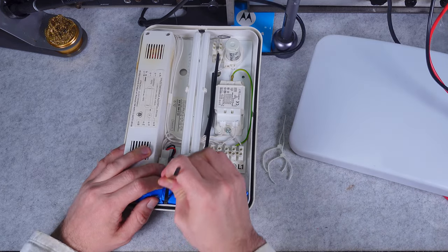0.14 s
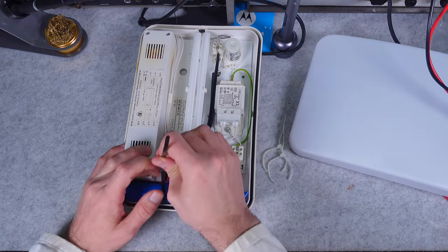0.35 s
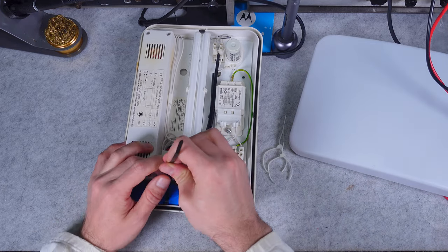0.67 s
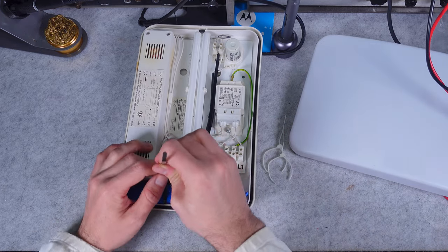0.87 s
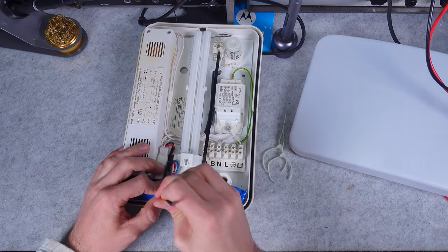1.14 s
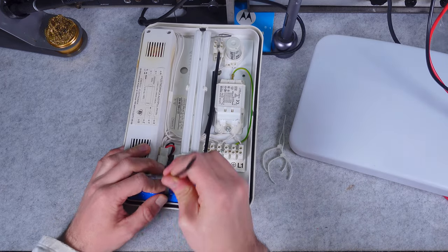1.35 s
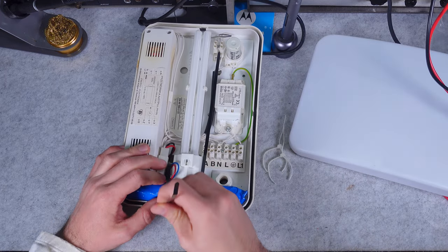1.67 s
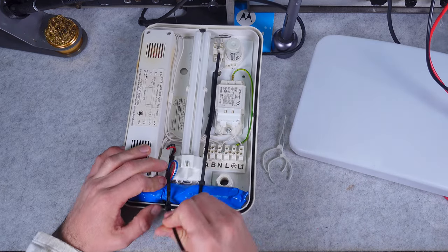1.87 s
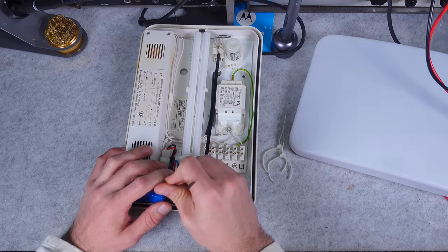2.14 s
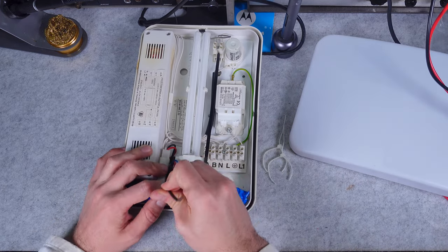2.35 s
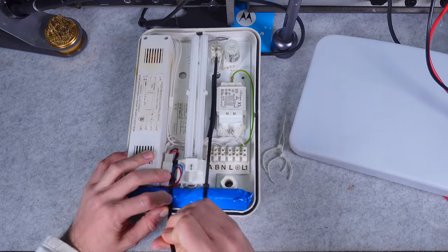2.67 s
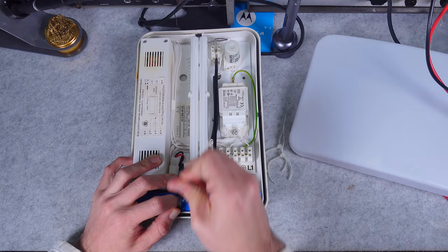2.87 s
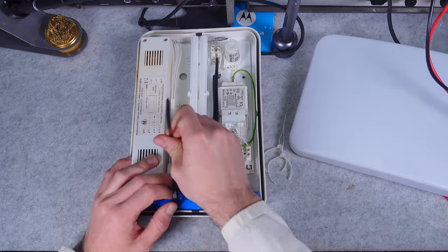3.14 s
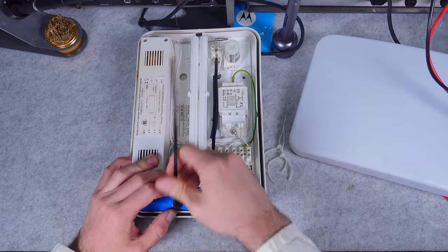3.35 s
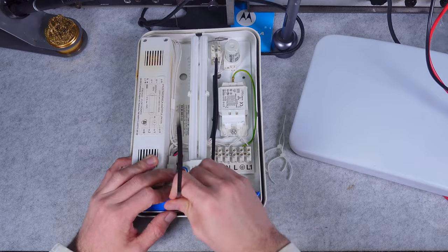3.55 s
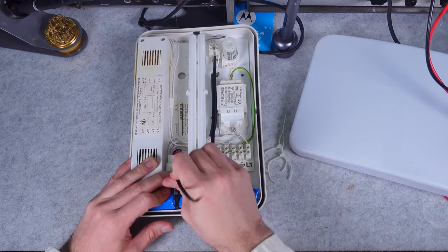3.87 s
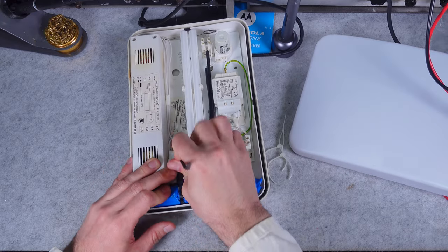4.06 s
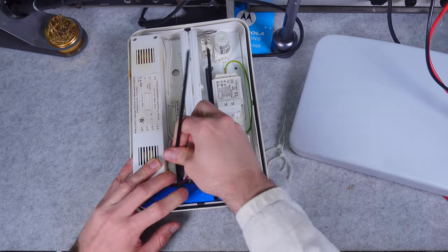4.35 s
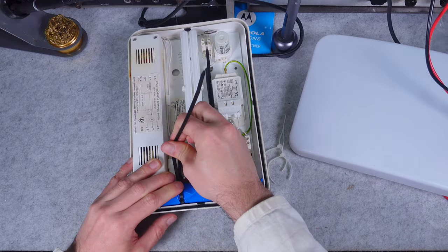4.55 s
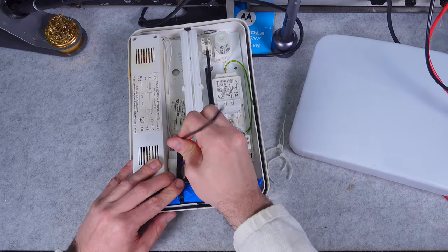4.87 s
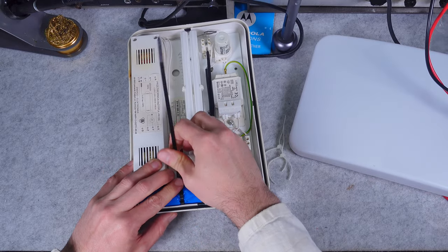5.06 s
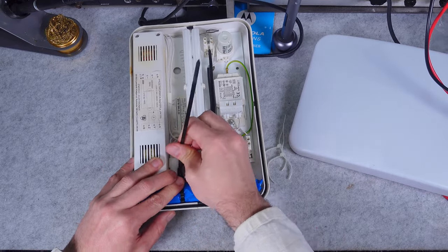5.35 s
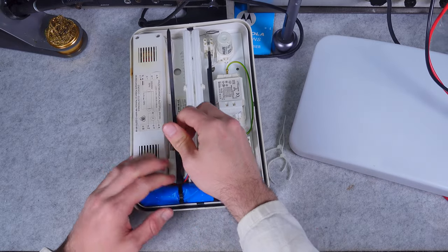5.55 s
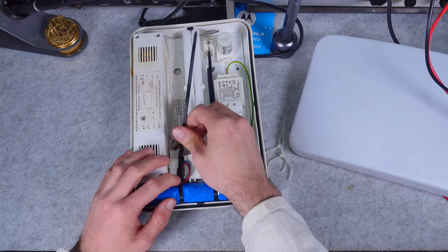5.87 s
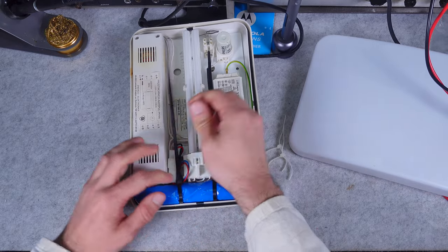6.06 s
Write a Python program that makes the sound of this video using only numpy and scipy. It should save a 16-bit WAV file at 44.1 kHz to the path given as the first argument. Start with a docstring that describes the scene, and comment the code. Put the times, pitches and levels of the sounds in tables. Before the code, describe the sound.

Nylon cable tie pulled tight in two quick ratcheting zips, amid close plastic rustling, finger rubs, ticks and knocks on a hollow housing.

```python
"""Two hands tighten a nylon cable tie around a battery pack inside a plastic lamp housing on a padded workbench.
Fingers slide and snag, a forearm brushes the mat, the loose tail ticks, the pack knocks and the strap creaks.
Near 0.9 s and again near 2.4 s the strap is pulled: clicks, one per tooth, run together into a zip.
Handling goes on to the end, with the hardest knocks after 4 s. Sliding is stick-slip noise; each blow is
a coloured noise burst. All is heard close, through the housing, in a small workshop with faint air."""
import sys
import numpy as np
from scipy import signal
from scipy.fft import rfft, irfft
from scipy.io import wavfile
from scipy.ndimage import uniform_filter1d

SR = 44100
rng = np.random.default_rng(int(sys.argv[2]) if len(sys.argv) > 2 else 0)


def transcribe(signal):
    """Save signal, clipped to [-1, 1], as a 16-bit WAV file at the path in sys.argv[1]."""
    frames = np.atleast_2d(signal).T
    limited = np.clip(frames, -1, 1)
    pcm = np.round(limited * 32767).astype(np.int16)
    wavfile.write(sys.argv[1], SR, pcm)


N = 273280

BLOW_SIZE = 4096   # samples in one blow
BLOW_T = np.arange(BLOW_SIZE) / SR
BLOW_HZ = np.fft.rfftfreq(BLOW_SIZE, 1 / SR)
TICK_THUD_DB = -15.5   # how much a light tick shakes the housing

# Edges of the thud, knock, click and snap bands of a blow. Two entries per band: lower and upper edge [Hz].
STRENGTH_HZ = [100, 300, 700, 1900, 3000, 6000, 10000, 16000]
# The heavy battery pack shifts and thumps the housing.
# Each row: start in seconds, ring in Hz, relative level in dB, contact in ms.
KNOCKS = [(0.0457, 1180, -2.5, 0.37), (3.9737, 3670, -10, 0.18), (4.1277, 2090, 3, 0.095),
          (4.136, 3370, 1, 0.21), (4.145, 2540, 10, 0.35), (4.1666, 3560, 0, 0.13), (4.237, 3800, -7, 0.15),
          (4.335, 4820, -16, .09), (4.4295, 1740, -7.5, 0.12), (4.7636, 1020, -7, 0.37),
          (5.5182, 5030, -9, 0.12), (5.5341, 5000, 0.5, 0.024), (6.171, 714, -8, 0.59)]
# Fingers slide on the plastic.
# Each row: start in seconds, length in seconds, relative level in dB, pressure relative to the rub in dB.
STROKES = [(0, 0.048, 14, -5), (0.069, .18, 8, -1), (0.37, 0.072, 1.5, 1), (0.493, 0.25, -11.5, 6),
           (0.881, .18, -1.5, 7.5), (1.093, 0.14, 5.5, -4.5), (1.427, 0.066, -8, -3),
           (1.665, 0.18, -10, 4.5), (1.806, 0.069, 3.5, 2), (2.013, .11, -11.5, 5.5), (2.252, 0.08, -9, 2),
           (2.61, 0.12, 8, 2), (2.757, 0.1, -0.5, -2), (2.967, 0.12, -3, -0.5), (3.197, 0.1, -7.5, -1),
           (3.455, 0.035, -1.5, -9), (3.61, 0.072, 2.5, -2.5), (3.729, 0.23, -4, -4), (3.959, .12, -2, 7),
           (4.088, 0.1, 5.5, 8), (4.259, 0.25, -1, 4), (4.525, 0.063, -1, 3), (4.745, .12, -3.5, 0.5),
           (4.961, 0.054, 5.5, -10), (5.28, 0.14, -0.5, 10), (5.362, 0.052, 4, 7), (5.52, .09, 2, 2.5),
           (5.945, .08, -1, 3), (6.128, 0.065, -8.5, 14)]


def from_db(db):
    """Decibels to gain."""
    return 10 ** (np.asarray(db) / 20)


def rms_one(x):
    """Scale to unit rms."""
    return x / np.sqrt(np.mean(x ** 2) + 1e-20)


def at_hz(points, hz):
    """Read a spectrum in dB on a log-frequency axis."""
    knots, values = np.transpose(points)
    return np.interp(np.log(np.maximum(hz, 1)), np.log(knots), values)


def tint(x, spectrum):
    """Give a steady sound a spectrum; rms 1."""
    gain = from_db(at_hz(spectrum, np.fft.rfftfreq(N, 1 / SR)))
    return rms_one(irfft(rfft(x) * gain, N))


def add(out, s, sound):
    """Mix a short sound in at time s."""
    start = int(np.clip(s * SR, 0, N - 1))
    out[start:start + len(sound)] += sound[:N - start]


def friction(slips_per_s, spread_db, slip_s, smooth):
    """Stick and slip: tiny dying bursts of uneven size over a smooth slide."""
    slips = rng.random(N) < slips_per_s / SR
    sizes = slips * from_db(spread_db * np.minimum(rng.exponential(1, N), 3))
    decay = np.exp(-2 / (slip_s * SR))
    energy = signal.lfilter([1], [1, -decay], sizes ** 2 + 1e-18)
    return rng.standard_normal(N) * np.sqrt(smooth + energy / energy.mean())


def blow(burst, strengths, colour_db):
    """Even out a burst's spectrum, then colour it with a causal (minimum-phase) filter."""
    power = uniform_filter1d(np.abs(rfft(burst)) ** 2, size=61) + 1e-12
    bands = list(zip(STRENGTH_HZ, np.repeat(strengths, 2)))
    gain = from_db(at_hz(bands, BLOW_HZ) + colour_db) / np.sqrt(power)
    # folding the cepstrum onto positive time turns the gain into a minimum-phase filter
    cepstrum = irfft(np.log(gain))
    cepstrum[1:BLOW_SIZE // 2] *= 2
    cepstrum[BLOW_SIZE // 2 + 1:] = 0
    return irfft(rfft(burst) * np.exp(rfft(cepstrum)))


def ring_peak(ring_hz, octaves, lift_db):
    """A resonance as a lift in dB over the spectrum of a blow."""
    return lift_db / (1 + (np.log2((BLOW_HZ + 1) / ring_hz) / octaves) ** 2)


def touch(level_db, contact_ms, thud_db):
    """Thud, knock, click and snap of a contact in dB; the longer it lasts, the less treble it has."""
    click_db, rolloff_slope = -0.5, 3.9
    centres_hz = np.sqrt(np.prod(np.reshape(STRENGTH_HZ, (-1, 2)), axis=1))
    cycles = centres_hz * contact_ms / 1000
    return level_db + np.array([thud_db, 0, click_db, 0]) - 10 * np.log10(1 + cycles ** rolloff_slope)


def contact(drag_s, fade_s, grain_db, ring_hz, ring_db, strengths):
    """Plastic drags, lets go and rings at one pitch."""
    # Colour of a contact on top of its four strengths. Each row: frequency in Hz, lift in dB.
    touch_colour = [(30, -22), (80, -12.5), (200, -7.5), (430, -3.5), (750, -1), (1400, -2.5), (3300, 1.5),
                    (7500, -3.5), (16000, -6)]
    swell = np.minimum(BLOW_T / drag_s, 1)
    fade = np.exp(-np.maximum(BLOW_T - drag_s, 0) / fade_s)
    roughness = rms_one(uniform_filter1d(rng.standard_normal(BLOW_SIZE), size=24))
    slips = from_db(grain_db * roughness)
    colour_db = at_hz(touch_colour, BLOW_HZ) + ring_peak(ring_hz, octaves=0.15, lift_db=ring_db)
    return blow(rng.standard_normal(BLOW_SIZE) * swell * fade * slips, strengths, colour_db)


def room_air():
    """The quiet room is a steady, faint noise, alike in both channels."""
    # Spectrum of the quiet room. Each row: frequency in Hz, relative dB per Hz.
    air_spectrum = [(30, -3), (70, 14), (350, -5), (700, 17.5), (2000, -6.5), (5000, -2), (16000, -16)]
    return from_db(-64.5) * tint(rng.standard_normal(N), air_spectrum)


def side_air():
    """Faint noise of opposite sign in the two channels widens the quiet."""
    # Spectrum of the opposed noise. Each row: frequency in Hz, relative dB per Hz.
    side_spectrum = [(30, 0), (80, 2), (300, 5), (1000, -7), (5000, -13), (15000, 1.5)]
    return from_db(-68.5) * tint(rng.standard_normal(N), side_spectrum)


def sleeve():
    """The forearm slides on the mat: cloth and skin brush it with a fine, high hiss."""
    # The slide is strongest as the hand takes its first grip. Each row: time in seconds, level in dB.
    brushing = [(0, -66), (.25, -61), (.36, -59), (.6, -60.5), (.85, -65.5), (1.5, -68.5), (5.8, -75)]
    # Spectrum of the brushing. Each row: frequency in Hz, relative dB per Hz.
    brush = [(1500, -14), (5000, 2), (8000, -2.5), (11000, 3), (16000, -9)]
    s, level_db = np.transpose(brushing)
    fibres = friction(slips_per_s=1600, spread_db=4, slip_s=0.00054, smooth=0.97)
    return from_db(np.interp(np.arange(N) / SR, s, level_db)) * tint(fibres, brush)


def stroke(start, length_s):
    """A finger gets moving, slides and comes to rest."""
    attack_s, release_s = 0.011, 0.037
    t = np.arange(N) / SR - start
    return np.clip(t / attack_s, 0, 1) * np.exp(-np.clip((t - length_s) / release_s, 0, 20))


def fingers(press_db, rub_db, hiss_db):
    """Skin presses on the housing and rubs over it; the ribbed strap crackles between the fingertips."""
    # Spectra of pressing, rubbing and crackling. Each row: frequency in Hz, relative dB per Hz.
    press_spectrum = [(25, -39), (50, -4), (80, -1.5), (130, -1.5), (230, -6), (400, 2.5), (700, -24.5),
                      (2000, -81)]
    rub_spectrum = [(200, -81), (450, -19.5), (700, 2.5), (1100, 5), (1600, 0.5), (2300, -2.5), (3500, -17),
                    (8000, -55)]
    hiss_spectrum = [(1200, -31), (2700, 0.5), (4000, 0.5), (5500, -6.5), (8000, -4), (12000, -9.5),
                     (16000, -9)]
    rub = press = from_db(-17)   # hands at rest on the housing
    for start, length_s, level_db, pressure_db in STROKES:
        motion = from_db(level_db) * stroke(start, length_s)
        rub = np.maximum(rub, motion)
        press = np.maximum(press, motion * from_db(pressure_db))
    hiss = rub ** 0.54   # dB of hiss per dB of stroke
    slide = friction(slips_per_s=180, spread_db=3.0, slip_s=0.0062, smooth=0.41)
    ribs = friction(slips_per_s=320, spread_db=3.8, slip_s=.003, smooth=.5)
    pressing = press * from_db(press_db) * tint(slide, press_spectrum)
    rubbing = rub * from_db(rub_db) * tint(slide, rub_spectrum)
    crackling = hiss * from_db(hiss_db) * tint(ribs, hiss_spectrum)
    return pressing + rubbing + crackling


def snags(spread_db, low_hz, high_hz):
    """Skin and strap snag: tiny ticks of random size and pitch, scattered over each stroke."""
    snags_per_s, contact_ms = 22, 0.37
    mean_db, follows = -19, 0.39   # level at a 0 dB stroke; dB of snag per dB of stroke
    out = np.zeros(N)
    for start, length_s, level_db, _ in STROKES:
        for k, (when, pitch, size) in enumerate(rng.random((6, 3))):
            snag_db = mean_db + follows * level_db + spread_db * (size - .5)
            snag = contact(drag_s=0.0003, fade_s=0.005, grain_db=4.5,
                           ring_hz=low_hz * (high_hz / low_hz) ** pitch, ring_db=10.5,
                           strengths=touch(snag_db, contact_ms, TICK_THUD_DB))
            after_s = (k + when) / snags_per_s
            if after_s < length_s:
                add(out, start + after_s, snag)
    return out


def scuffs(scuff_db, linger):
    """Strap and fingers drag over an edge: the noise swells, and the longer the drag the slower it fades."""
    # Each row: start in seconds, drag before the peak in seconds, ring in Hz, relative level in dB, contact in ms.
    scuff_rows = [(.02, 0.02, 730, 6, 0.48), (.208, 0.0059, 2090, -4, 0.1), (.338, 0.016, 1010, -4, 0.6),
                  (1.424, 0.0069, 1250, -6.5, 1), (1.455, 0.0048, 1010, -12.5, 0.38),
                  (1.842, 0.0082, 3800, 0, 0.067), (2.125, 0.003, 1040, -6, 0.58),
                  (2.166, 0.0039, 1210, -5.5, 1), (3.676, 0.0072, 1090, -1.5, 0.27),
                  (3.804, .0015, 2050, -12, 0.43), (3.892, 0.0072, 4220, -8, 0.25),
                  (3.923, 0.0049, 1460, -5.5, 0.3), (4.05, 0.0038, 3970, -7, .22),
                  (4.156, .01, 715, 9.5, 0.65), (4.9861, 0.0076, 2920, 2.5, 0.11),
                  (5.164, .002, 850, -4.5, 1), (5.281, .005, 1050, 0.5, 0.96)]
    out = np.zeros(N)
    for s, drag_s, ring_hz, level_db, contact_ms in scuff_rows:
        thud_db = -12 + 2 * level_db   # a hard scuff moves the housing
        strengths = touch(level_db + scuff_db, contact_ms, thud_db)
        add(out, s, contact(drag_s, fade_s=0.0036 + linger * drag_s, grain_db=2.0,
                            ring_hz=ring_hz, ring_db=5.5, strengths=strengths))
    return out


def ticks_and_knocks(tick_db):
    """Short contacts start almost at once and ring briefly; the pack's knocks carry more thud."""
    # The strap's tail and fingernails tick on the plastic.
    # Each row: start in seconds, ring in Hz, relative level in dB, contact in ms.
    tick_rows = [(.1357, 2040, -3, 0.068), (.2681, 3070, -10.5, 0.2), (.467, 3720, -8.5, 0.16),
                 (.4873, 3020, -5, 0.18), (.5019, 3100, -5.5, 0.21), (.6515, 4330, -5, 0.092),
                 (.8712, 3430, -15, 0.18), (1.2696, 4000, -8, 0.086), (1.5788, 1000, -6.5, 0.93),
                 (1.592, 5340, -5, 0.13), (1.775, 1340, -7, 0.86), (1.7981, 3600, -11, 0.22),
                 (1.8055, 1380, -1, 0.091), (2.0006, 3780, -13, 0.29), (2.1118, 1040, -7, 0.32),
                 (2.2741, 3820, -7.5, 0.19), (2.7719, 5100, -9.5, 0.081), (2.864, 2010, -15, 0.094),
                 (2.881, 3980, -12, 0.084), (2.9638, 6950, -6, 0.19), (3.0132, 5130, -8.5, 0.073),
                 (3.1034, 1560, -5.5, 0.42), (3.1148, 1470, -9, 0.39), (3.2075, 3920, -12, 0.2),
                 (3.285, 3440, -11.5, 0.19), (3.4498, 1900, -10.5, 0.11), (3.5614, 3060, -4, 0.12),
                 (3.6046, 3900, -1.5, 0.1), (3.6483, 2060, -10, 0.08), (3.73, 1000, -6, 0.32),
                 (4.005, 11100, -16.5, 0.045), (4.5464, 5260, -14, 0.055), (4.7313, 986, 0.5, 0.46),
                 (4.8151, 1500, 6.5, 0.73), (5.4923, 3870, -8, 0.14), (5.9527, 1170, -6, 0.11),
                 (5.9908, 5240, -6.5, 0.077), (6.016, 726, -5, 0.18), (6.1242, 6700, -5, 0.14)]
    out = np.zeros(N)
    for rows, thud_db in ((tick_rows, TICK_THUD_DB), (KNOCKS, 3.5)):
        for s, ring_hz, level_db, contact_ms in rows:
            strengths = touch(level_db + tick_db, contact_ms, thud_db)
            add(out, s, contact(drag_s=0.001, fade_s=.0053, grain_db=1.0,
                                ring_hz=ring_hz, ring_db=9, strengths=strengths))
    return out


def bench():
    """Knocks reach the benchtop through the mat, and it booms briefly in decaying sines."""
    # Modes of the benchtop. Each row: frequency in Hz, level at a 0 dB knock in dB, 60 dB decay in seconds.
    bench_modes = [(146, -57, 0.22), (196, -48, 0.29)]
    boom_growth = 1.68   # dB of boom per dB of knock
    t = np.arange(SR // 2) / SR
    boom = sum(from_db(db - 60 * t / t60) * np.sin(2 * np.pi * hz * t) for hz, db, t60 in bench_modes)
    out = np.zeros(N)
    for s, _, level_db, _ in KNOCKS:
        add(out, s, from_db(boom_growth * level_db) * boom)
    return out


def creaks(unevenness_db, jitter_s):
    """The ribbed strap slips rib by rib between the fingertips: uneven small ticks at one pitch."""
    # Each row: start in seconds, length in seconds, ring in Hz, relative level in dB.
    creak_rows = [(0.066, .06, 4050, -19.5), (0.515, .015, 3000, -14), (0.534, .05, 3370, -11.5),
                  (2.784, .03, 4100, -17.5), (2.975, .07, 4040, -14.5), (3.326, .01, 3320, -21.5),
                  (3.63, .07, 2580, -18.5), (3.774, .012, 5100, -20), (5.389, .05, 2280, -20.5),
                  (5.576, .04, 2400, -15)]
    slips_per_s = 45
    out = np.zeros(N)
    for start, length_s, ring_hz, level_db in creak_rows:
        for after_s in np.arange(0, length_s, 1 / slips_per_s):
            slip_db = level_db + rng.normal(0, unevenness_db)
            strengths = touch(slip_db, contact_ms=0.13, thud_db=-11.5)
            slip = contact(drag_s=0.0011, fade_s=0.01, grain_db=3.0,
                           ring_hz=ring_hz, ring_db=14.0, strengths=strengths)
            add(out, start + after_s + rng.normal(0, jitter_s), slip)
    return out


def rattle(crack_s, ring_s, ring_db):
    """A sharp crack, then its scatter through the strap and the housing."""
    fade = np.exp(-BLOW_T / crack_s) + from_db(ring_db) * np.exp(-BLOW_T / ring_s)
    return rng.standard_normal(BLOW_SIZE) * fade


def tooth(force_db, snap_db):
    """Thud, knock, click and snap of one tooth in dB; the thud grows fastest with force."""
    return [2.5 + 2.5 * force_db, force_db, force_db - 2.5, snap_db]


def tooth_colour():
    """The spectrum of a tooth, shaped by the taut strap."""
    # Colour of a tooth on top of its four strengths. Each row: frequency in Hz, lift in dB.
    tooth_spectrum = [(30, -29), (70, -14.5), (200, -7), (400, -2.5), (750, 0.5), (1400, 0), (2100, -3),
                      (3300, -0.5), (5500, -4), (7800, -2), (9500, 0), (13000, 0), (16000, -5.5)]
    # Peaks and dips of the taut strap. Each row: frequency in Hz, half width in octaves, lift in dB.
    strap_peaks = [(2400, 0.25, 2.5), (3550, 0.16, -4), (5150, 0.046, 4), (7900, 0.13, -1)]
    return at_hz(tooth_spectrum, BLOW_HZ) + sum(ring_peak(*row) for row in strap_peaks)


def catches(level_db):
    """Single teeth let go under tension and shake the whole strap."""
    # The pawl drops into single teeth as a pull starts or stalls.
    # Each row: start in seconds, force in dB, sharpness of the snap in dB.
    catch_rows = [(0.9059, -2, 0), (0.9157, 0.5, -5), (1.087, 5, 3.5), (1.1613, -1, 0.5), (1.1667, -6, -16),
                  (1.1734, -5.5, -9), (1.1902, -8, -4.5), (2.4087, -1, 1.5), (2.421, 1, -1),
                  (2.4373, -2, 1), (2.4518, -2.5, -21), (2.46, 1, -1), (2.482, -1, -7)]
    out, colour_db = np.zeros(N), tooth_colour() + level_db
    for s, force_db, snap_db in catch_rows:
        burst = rattle(crack_s=0.00079, ring_s=0.0069, ring_db=17)
        add(out, s, blow(burst, tooth(force_db, snap_db), colour_db))
    return out


def pull(rows, ring_hz, ring_db, variety, unevenness_db):
    """One click per tooth; the teeth are alike, so a fast pull turns into a pitched zip and then a rasp."""
    most_teeth = 64
    jitter_s = .00012   # no two teeth let go quite alike
    full_rasp_teeth_per_s = 334
    s, speeds, forces_db, snaps_db = np.transpose(rows)
    # add up the speed into teeth passed, then find when each tooth passes
    clock = np.arange(s[0], s[-1], 1 / SR)
    travel = np.cumsum(np.interp(clock, s, speeds)) / SR
    times = np.interp(np.arange(travel[-1]), travel, clock)
    colour_db = tooth_colour() + ring_peak(ring_hz, octaves=.12, lift_db=ring_db)
    bursts = [rattle(crack_s=0.00016, ring_s=0.0047, ring_db=-1.5) for _ in range(most_teeth + 1)]
    common, *own = bursts
    out = np.zeros(N)
    for t, scatter, (late, harder) in zip(times, own, rng.standard_normal((most_teeth, 2))):
        speed, force_db, snap_db = [np.interp(t, s, c) for c in (speeds, forces_db, snaps_db)]
        # the rasp rises steeply with speed
        rasp_lift_db = 10 * min(speed / full_rasp_teeth_per_s, 1) ** 6
        rasp_db = ring_peak(5150, octaves=0.15, lift_db=rasp_lift_db)
        click_colour_db = colour_db + rasp_db + unevenness_db * harder
        click = blow(common + variety * scatter, tooth(force_db, snap_db), click_colour_db)
        add(out, t + jitter_s * late, click)
    return out


def ratchet():
    """The pawl catches single teeth, and twice the strap's teeth zip past it."""
    # The two pulls. Each row: time in seconds, speed in teeth per second, force in dB, sharpness of the snap in dB.
    first_pull = [(.9224, 204, -1.5, -0.5), (.955, 235, -0.5, -0.5), (.985, 171, -4, -0.5),
                  (1.005, 220, -2, -3.5), (1.05, 254, -3, -4), (1.08, 146, -4.5, -3.5), (1.1, 195, -1, -4),
                  (1.135, 140, -1.5, -6.5), (1.157, 120, -6, -4)]
    second_pull = [(2.4964, 85.2, 1.5, -3), (2.527, 150.9, 0.5, -7.5), (2.555, 229, 1.5, -8.5),
                   (2.59, 323.2, 1.5, -6.5), (2.618, 220.4, 3.5, -4.5), (2.66, 124.8, -4, -16),
                   (2.714, 120.5, -2, -27)]
    return (catches(level_db=1.5)
            + pull(first_pull, ring_hz=9050, ring_db=3.5, variety=0.5, unevenness_db=0.9)
            + pull(second_pull, ring_hz=13100, ring_db=5, variety=0.45, unevenness_db=0.3))


def housing(x):
    """The hollow plastic shell lifts its resonances and lets them ring on."""
    # Resonances of the shell. Each row: frequency in Hz, width in Hz, lift in dB.
    shell_modes = [(207.5, 52, 3.5), (237, 52, 5), (330, 20, 4.5), (408, 22, 3), (497.6, 18, 4),
                   (682, 54, 4.5), (762, 49, 4.5), (924, 18, 5.5), (1001, 24, 6.5), (1120, 14, 3.5),
                   (1413, 29, 5.5), (2105, 81, 5.5)]
    out = x.copy()
    for hz, width_hz, lift_db in shell_modes:
        r = np.exp(-np.pi * width_hz / SR)
        feedback = [1, -2 * r * np.cos(2 * np.pi * hz / SR), r * r]
        ringing = (1 - r * r) / 2 * signal.lfilter([1, 0, -1], feedback, x)
        out += (from_db(lift_db) - 1) * ringing
    return out


def workshop(x, build_s, t60_s, damping_hz):
    """Diffuse echoes build up and die away, band by band, the treble first."""
    # Echo of the workshop. Each row: frequency in Hz, relative echo level in dB.
    room_level = [(100, 1), (700, -7.5), (4000, -10.5), (14000, -11)]
    t, echo = np.arange(SR * 3 // 4) / SR, 0
    edges = np.geomspace(60, 18000, 9)
    for low, high in zip(edges, edges[1:]):
        hz = np.sqrt(low * high)
        decay = np.exp(-np.log(1000) * t * (1 + hz / damping_hz) / t60_s)
        fade = (1 - np.exp(-t / build_s)) * decay
        tail = rng.standard_normal(len(t)) * fade / np.sqrt(np.sum(fade ** 2))
        band = signal.butter(2, [low, high], "band", fs=SR, output="sos")
        echo = echo + from_db(at_hz(room_level, hz)) * signal.sosfilt(band, tail)
    return signal.fftconvolve(x, echo)[:N]


def width(x):
    """A quarter-cycle phase shift, weighted by frequency, gives a trace of difference between the channels."""
    # Each row: frequency in Hz, relative level of side against mid in dB.
    side_level = [(60, -16), (110, 1.5), (200, -10), (380, -8), (700, -38), (1290, -85), (2380, -68),
                  (4400, -56), (8120, -34.5), (15000, -15)]
    gain = from_db(at_hz(side_level, np.fft.rfftfreq(N, 1 / SR)))
    return irfft(1j * rfft(x) * gain, N)


def scene():
    """Tie, touches and fingers sound through the housing, centred and almost mono, over faint air."""
    handling = (fingers(press_db=-64.5, rub_db=-52.5, hiss_db=-59.0)
                + snags(spread_db=14.5, low_hz=1380, high_hz=5320)
                + scuffs(scuff_db=-0.5, linger=0.41)
                + ticks_and_knocks(tick_db=-1.0)
                + creaks(unevenness_db=1.0, jitter_s=.0015))
    near = sleeve() + bench() + housing(handling + ratchet())
    mid = near + workshop(near, build_s=0.0013, t60_s=0.39, damping_hz=25000)
    side = side_air() + from_db(-15.5) * width(mid)
    return mid + room_air() + side * np.array([[1], [-1]])


def record(dry):
    """The microphone drops the deepest bass; the top is cut steeply."""
    low_cut = signal.butter(2, 52, "high", fs=SR, output="sos")
    top_cut = signal.ellip(10, .2, 70, 15900, fs=SR, output="sos")
    return signal.sosfilt(top_cut, signal.sosfilt(low_cut, dry))


dry = scene()
out = record(dry)
transcribe(out)
```